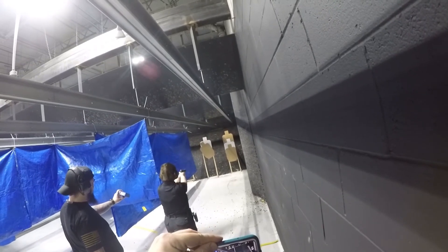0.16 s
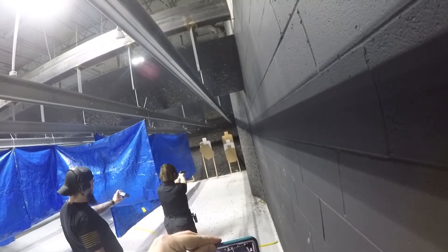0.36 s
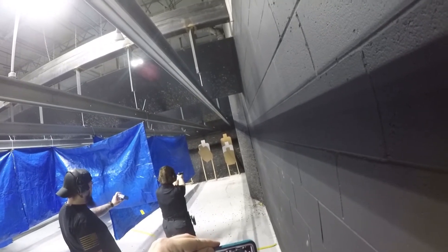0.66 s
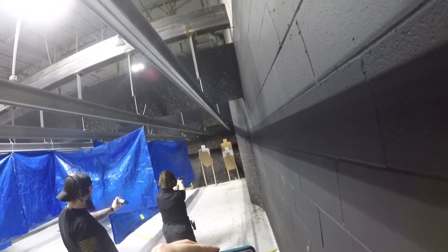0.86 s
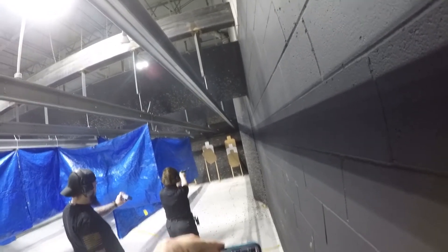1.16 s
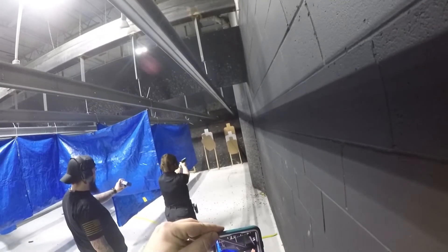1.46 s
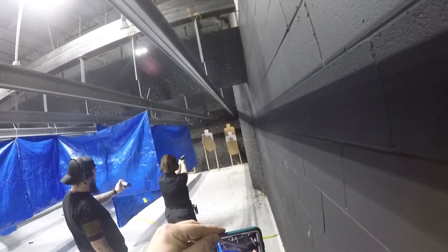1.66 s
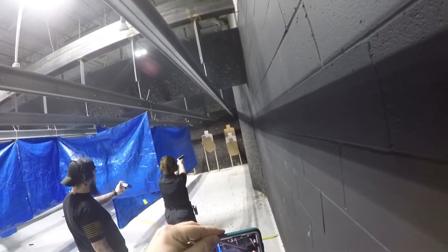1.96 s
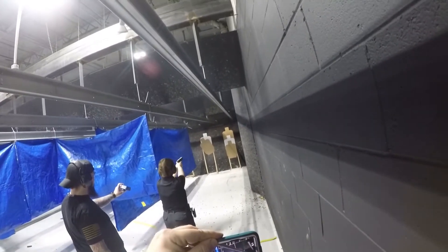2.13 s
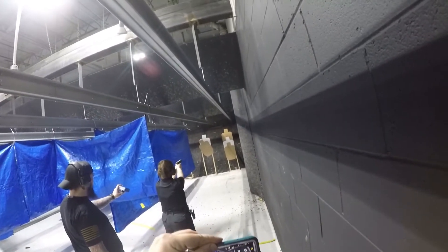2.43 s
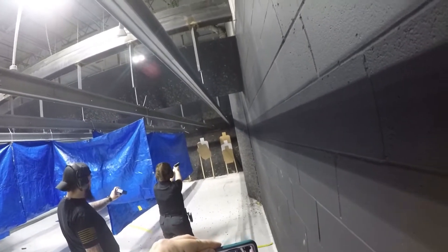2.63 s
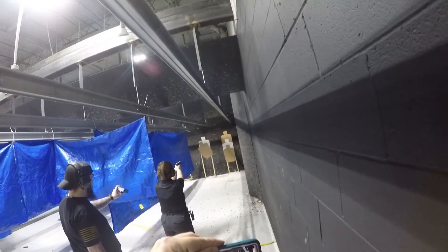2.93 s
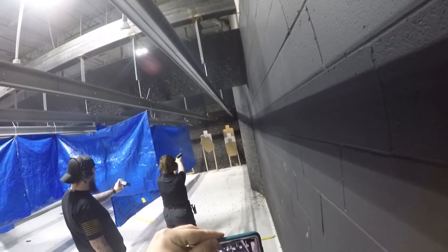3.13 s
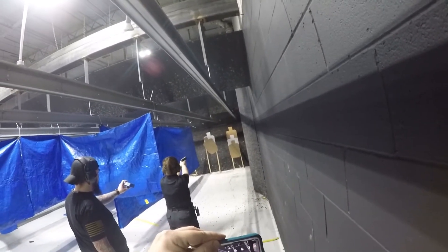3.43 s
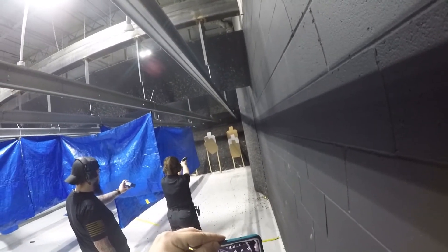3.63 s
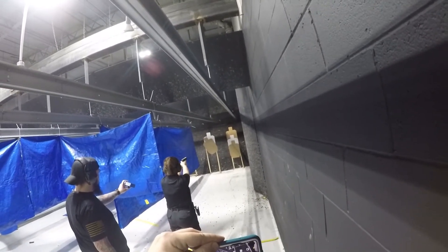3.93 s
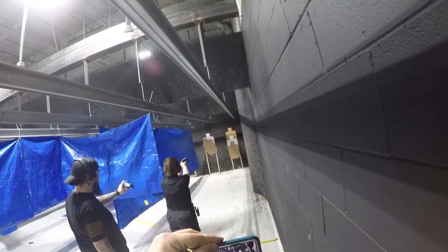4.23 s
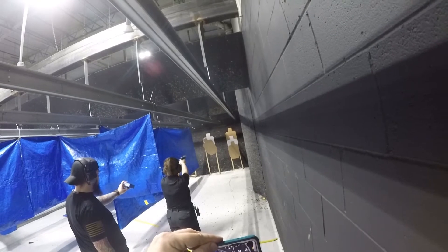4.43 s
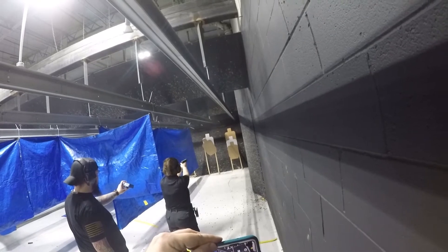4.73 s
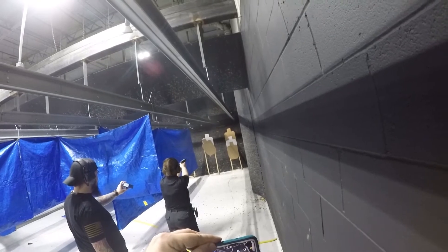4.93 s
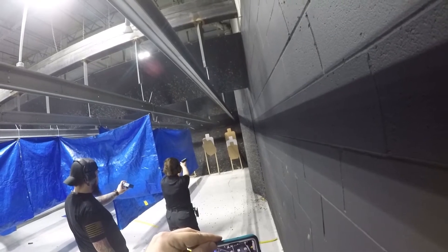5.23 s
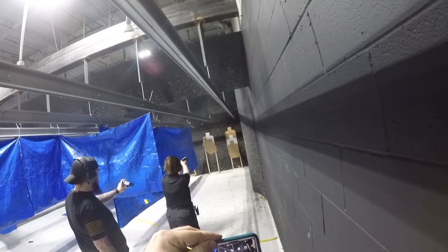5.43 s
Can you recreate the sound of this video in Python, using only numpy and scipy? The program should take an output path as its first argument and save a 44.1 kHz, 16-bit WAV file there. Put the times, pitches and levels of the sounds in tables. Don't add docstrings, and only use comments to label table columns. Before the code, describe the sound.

The dying echo of a gunshot, tiny casing clinks, then three spaced handgun blasts with dense reverberation over faint ventilation noise.

```python
import sys
import numpy as np
from scipy import signal
from scipy.fft import rfft, irfft
from scipy.io import wavfile
from scipy.ndimage import map_coordinates

SR = 44100
rng = np.random.default_rng(int(sys.argv[2]) if len(sys.argv) > 2 else 0)


def level_to_linear(level):
    exponent = np.asarray(level, float) / 20
    return 10 ** exponent


def dump(signal):
    limited = np.clip(np.atleast_2d(signal).T, -1, 1)
    pcm = np.round(limited * 32767).astype(np.int16)
    wavfile.write(sys.argv[1], SR, pcm)


N = 246208


def at_hz(points, hz, column=1):
    points = np.array(points)
    return np.interp(np.log(hz), np.log(points[:, 0]), points[:, column])


def coloured(x, *spectra):
    hz = np.maximum(np.arange(len(x) // 2 + 1) * SR / len(x), 10)
    gain_db = sum(at_hz(s, hz) for s in spectra)
    y = irfft(rfft(x) * level_to_linear(gain_db), len(x))
    return y / np.sqrt(np.mean(y ** 2))


def drift(rate_hz):
    points = rng.standard_normal(400)
    return map_coordinates(points, [np.arange(N) / SR * rate_hz], order=3, mode="wrap")


def ring(clicks, hz, t60):
    r, w = level_to_linear(-60 / (t60 * SR)), 2 * np.pi * hz / SR
    return signal.lfilter([0, np.sin(w)], [1, -2 * r * np.cos(w), r * r], clicks + 1e-18)


def add(out, sound, s):
    at = round(s * SR)
    part = sound[max(-at, 0):N - at]
    out[max(at, 0):max(at, 0) + len(part)] += part


# t/s, blast level/dB, diaphragm push level/dB, booth ring level/dB, gain drop/dB
SHOTS = [
    (-.15, 3, -10, -14.5, 7),
    (1.0322, 3.5, -4, -15, 9),
    (3.0183, 5.5, -6, -2.5, 17),
    (4.3376, 5, -1, -7.5, 14),
]
# delay t/s, level/dB, length t/s
ARRIVALS = [(.0002, 5.5, .003), (.0047, 5, 0.003), (0.013, 1, .005), (0.018, -7, 0.0033),
            (.0245, -3.5, 0.0026), (0.042, -3, 0.0023)]
# f/Hz, level/dB per Hz
BLAST_SPECTRUM = [(18, -31), (35, -9.5), (110, -6), (160, 1.5), (300, 0), (450, -5), (700, -2.5),
                  (1200, -1), (2500, -1.5), (4000, 0.5), (6000, 4.5), (10000, 4.5), (16000, -11.5)]
# f/Hz, level/dB
HOUSING = [(1640, -10.5), (1800, -2), (2230, -6), (2600, 0), (3300, -1), (3520, -8), (4100, -8),
           (4400, -17.5), (4850, -16.5), (5850, -29), (6150, -22), (7250, -23), (9300, -39), (9900, -33)]
# f/Hz, early T60 t/s, late T60 t/s, late tail level/dB, build-up t/s
HALL = [(40, 0.27, 3.2, -25.5, 0.011), (120, 0.54, 1.6, -9, .02), (250, 0.14, 1.37, -10, 0.007),
        (690, 0.22, 1.693, -11.5, .004), (2390, 0.092, 1.396, -6.5, 0.0049), (5380, 0.26, 0.9, -10, .002),
        (7900, 0.075, 0.6, -7.5, 0.0022), (10600, 0.22, 0.5, -5, 0.003), (15000, 0.18, 0.18, -8.5, 0.0022)]
UNLIKE = .45
BOOM_FOLLOWS, USUAL_BOOTH_DB = .45, -14


def shots():
    t, out = np.arange(2 * SR) / SR, np.zeros(N)
    usual = rng.standard_normal(len(t))
    own = rng.standard_normal((len(SHOTS), len(t)))
    mixed = np.sqrt(1 - UNLIKE) * usual + np.sqrt(UNLIKE) * own
    spectra = rfft(np.array([coloured(e, BLAST_SPECTRUM, HOUSING) for e in mixed]))
    bursts = sum(level_to_linear(db) * np.sin(np.pi * np.clip((t - lag) / long, 0, 1)) for lag, db, long in ARRIVALS)
    booth_excess_db = np.array(SHOTS)[:, 3:4] - USUAL_BOOTH_DB
    bin_octaves = np.log2(np.arange(SR + 1) / 2 + 1)
    centres = np.arange(5, 14.1, 1 / 3)
    blasts = 0
    for k, octave in enumerate(centres):
        share = np.interp(bin_octaves, centres, np.arange(len(centres)) == k)
        early, late, late_db, rise = (at_hz(HALL, 2 ** octave, column=c) for c in range(1, 5))
        decay = np.sqrt(level_to_linear(-120 * t / early) + level_to_linear(2 * late_db - 120 * t / late))
        build_up = (1 - np.exp(-t / rise)) ** 2
        bright = np.clip((octave - 9.5) / 0.86, 0, 1) * np.clip((14.0 - octave) / 2.4, 0, 1)
        low = np.clip(9.0 - octave, 0, 1) * np.clip(octave - 5.5, 0, 1)
        boom = level_to_linear(BOOM_FOLLOWS * booth_excess_db * low)
        blasts = blasts + boom * irfft(spectra * share) * decay * (build_up + bright * bursts)
    for (s, db, *_), blast in zip(SHOTS, blasts):
        add(out, level_to_linear(db - 6.0) * blast, s)
    return out


PUSH_AT_S, PUSH_WIDE_S = .0102, .0022
BOOTH_HZ, BOOTH_T60_S = 253.1, 0.016


def thumps():
    t, out = np.arange(SR // 5) / SR, np.zeros(N)
    push = np.exp(-.5 * ((t - PUSH_AT_S) / PUSH_WIDE_S) ** 2)
    rebound = signal.sosfilt(signal.butter(2, 38.0, "high", fs=SR, output="sos"), push)
    booth_envelope = (1 - np.exp(-t / 0.00035)) * level_to_linear(-60 * (t / BOOTH_T60_S) ** 2)
    booth = -np.sin(2 * np.pi * BOOTH_HZ * (t - .0026)) * booth_envelope
    for s, _, push_db, booth_db, _ in SHOTS:
        add(out, level_to_linear(push_db) * rebound + level_to_linear(booth_db) * booth, s)
    return out


# t/s, tick peak level/dB, tick f/Hz, edge level/dB, scatter level/dB
TICKS = [(0.5826, -40, 5240, -13, -22), (0.9752, -46.5, 4315, -20, -11.5), (1.73, -35.5, 4820, -33, -22),
         (1.9397, -62, 4070, -14, -17), (1.9678, -44.5, 5300, -24, -18), (2.2494, -64, 4660, -14, -17),
         (2.4003, -58, 7300, -22, -21), (2.42, -62, 7170, -26, -22.5), (2.522, -62, 7300, -24, -20),
         (2.6694, -62, 4020, -16, -17), (3.7549, -39.5, 5200, -13.5, -11.5), (4.2729, -48, 5250, -12, -9.5),
         (5.027, -44.5, 4080, -13, -20), (5.5140, -42, 4600, -34, -15), (5.5315, -58, 4620, -14.5, -19),
         (5.5416, -44.5, 4400, -30, -18)]
EDGE_HZ = 6900


def ticks():
    t, out = np.arange(SR // 4) / SR, np.zeros(N)
    noises = rng.standard_normal((len(TICKS), len(t)))
    for (s, db, hz, edge_db, scatter_db), noise in zip(TICKS, noises):
        contact = noise * (level_to_linear(-60 * t / 0.0067) + level_to_linear(scatter_db - 60 * t / 0.22))
        knock = ring(ring(contact, hz, .003), hz, .003) / 24
        edge = ring(contact * (.5 + .5 * level_to_linear(-60 * t / .02)), EDGE_HZ, .0012)
        add(out, level_to_linear(db - 3) * (knock + level_to_linear(edge_db) * edge), s)
    return signal.sosfilt(signal.butter(2, 3800, "high", fs=SR, output="sos"), out)


# f/Hz, level/dB, T60 t/s
TUBE_MODES = [(9760, 0, .5), (9805, -14, .3)]
# t/s, level/dB, hop length t/s, tumble f/Hz
HOPS = [(.462, -75, .09, 60), (.582, -78, .012, 20), (.645, -79, .04, 10), (.77, -80, .05, 7.4),
        (.855, -67.5, 0.11, 7), (.957, -66, 0.066, 19), (1.73, -65, 0.11, 65), (1.935, -64, 0.094, 42),
        (2.068, -69, 0.051, 7.1), (2.14, -82, .055, 22), (2.246, -65, .058, 18), (2.37, -80, 0.055, 8),
        (2.608, -59.5, 0.029, 6.6), (2.67, -63, 0.05, 22.5), (3.755, -62.5, .075, 35),
        (4.275, -71, 0.044, 39), (4.852, -69, 0.048, 11), (5.03, -64.5, 0.084, 54), (5.515, -65, .09, 39)]


def brass():
    t, out = np.arange(SR // 3) / SR, np.zeros(N)
    for (s, db, hop, tumble_hz), chance in zip(HOPS, rng.random((len(HOPS), 3))):
        detune_hz = 30 * (chance[0] - .5)
        tone = sum(level_to_linear(d - 60 * t / t60) * np.sin(2 * np.pi * (hz + detune_hz) * t)
                   for hz, d, t60 in TUBE_MODES)
        uneven_t = t + .3 * hop * np.sin(7.0 * chance[1] * t / hop)
        turning = np.sin(2 * np.pi * tumble_hz * uneven_t + .3)
        choke = level_to_linear(-40 * np.clip((t - hop) / .008, 0, 1)) * np.minimum(t / .003, 1)
        add(out, level_to_linear(db - 1.0) * tone * (turning + 0.25) * choke, s)
    echo = rng.standard_normal(len(t)) * level_to_linear(-39 - 60 * t / .5)
    return out + signal.fftconvolve(out, echo)[:N]


# t/s, peak level/dB, f/Hz
KNOCKS = [
    (1.955, -52.5, 1480),
    (1.959, -50.5, 1850),
    (2.395, -55, 1610),
    (2.65, -63, 1535),
    (2.81, -50.5, 2770),
    (2.47, -66, 776),
]


def knocks():
    t, out = np.arange(SR // 2) / SR, np.zeros(N)
    for (s, db, hz), noise in zip(KNOCKS, rng.standard_normal((len(KNOCKS), len(t)))):
        swell = (1 - np.exp(-t / .01)) * level_to_linear(-60 * t / .3)
        add(out, level_to_linear(db - 14) * ring(noise * swell, hz, 20 / hz), s)
    return out


def shot_offsets():
    return np.arange(N) / SR - np.array(SHOTS)[:, :1]


def since_shot():
    offset = shot_offsets()
    return np.min(np.where(offset >= 0, offset, np.inf), axis=0)


GATE_HOLD_S, GATE_OPEN_S = 0.82, 0.76


def gate_shut():
    return np.cos(np.pi / 2 * np.clip((since_shot() - GATE_HOLD_S) / GATE_OPEN_S, 0, 1)) ** 2


# f/Hz, level/dB per Hz
RUMBLE_SPECTRUM = [(8.8, -37), (15, -4), (60, -1.5), (128, -11), (179, -18), (214, -25), (244, -19.5),
                   (500, -36), (650, -66.5), (1100, -120)]
# f/Hz, level/dB per Hz
AIR_SPECTRUM = [(180, -35.5), (300, -7.5), (520, -9.5), (1150, -13), (1450, -5.5), (1650, -11), (1850, -2),
                (2200, -5), (3050, 1), (3550, -11), (4500, -12), (5500, -19.5), (6400, -18.5), (15000, -37)]
FAN_HZ, FAN_DB = 188.3, -62.5
RUMBLE_DB, AIR_DB = -48.5, -55.5
GATE_RUMBLE_DB, GATE_AIR_DB = -9, -8.5
STIR_DB, STIR_T60_S = -37.5, 1.1


def ventilation():
    shut = gate_shut()
    stirred = level_to_linear(STIR_DB - 60 * since_shot() / STIR_T60_S)
    draught = level_to_linear(RUMBLE_DB + GATE_RUMBLE_DB * shut) + stirred
    rumble = coloured(rng.standard_normal(N), RUMBLE_SPECTRUM) * draught * level_to_linear(2 * drift(33))
    fan = ring(rng.standard_normal(N), FAN_HZ, 0.15)
    air_gain = level_to_linear(AIR_DB + GATE_AIR_DB * shut + .7 * drift(10))
    air = coloured(rng.standard_normal(N), AIR_SPECTRUM) * air_gain
    return rumble + level_to_linear(FAN_DB) * fan / np.std(fan) + air


# t/s, peak level/dB, f/Hz, length t/s
BUMPS = [
    (.99, -50.5, 60, .02),
    (2.553, -38, 55, .018),
    (2.775, -40, 57, .016),
    (2.976, -37, 50, 0.0092),
    (4.289, -52.5, 55, .03),
    (5.554, -46.5, 60, .025),
]


def bumps():
    t = np.arange(N) / SR
    return sum(level_to_linear(db) * np.sin(2 * np.pi * hz * (t - s)) * np.exp(-.5 * ((t - s) / long) ** 2)
               for s, db, hz, long in BUMPS)


def scene():
    blasts = shots() + thumps()
    cases = level_to_linear(7) * (ticks() + brass())
    background = level_to_linear(6.0) * knocks() + ventilation() + bumps()
    return (blasts + cases + background)[None]


def band_limit(x):
    return signal.sosfilt(signal.butter(12, 15500, fs=SR, output="sos"), x)


DUCK_S, RECOVER_S = 0.15, 0.78
AHEAD_S, AHEAD_DB = .015, 13
HISS_DB, GATE_HISS_DB = -77.5, -5.5


def record(dry):
    offset = shot_offsets()
    since = np.maximum(offset, 0)
    shape = (1 - np.exp(-since / DUCK_S)) * np.exp(-(since / RECOVER_S) ** 1.7)
    duck_db = np.max(np.array(SHOTS)[:, -1:] * shape, axis=0)
    ahead = np.max(np.clip(4 * (1 + offset / AHEAD_S), 0, 1) * (offset < 0), axis=0)
    hiss_db = HISS_DB + GATE_HISS_DB * gate_shut() - .5 * duck_db
    hiss = level_to_linear(hiss_db) * np.diff(rng.standard_normal(N + 1))
    x = (dry + hiss) * level_to_linear(-duck_db - AHEAD_DB * ahead)
    railed = .9 * x / (1 + np.abs(x) ** 4) ** (1 / 4)
    lowpass = signal.cheby2(14, 40, 15650, fs=SR, output="sos")
    return band_limit(signal.sosfilt(lowpass, railed).clip(-.93, .93))


dry = scene()
out = record(dry)
dump(out)
```